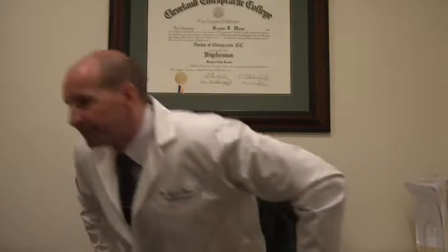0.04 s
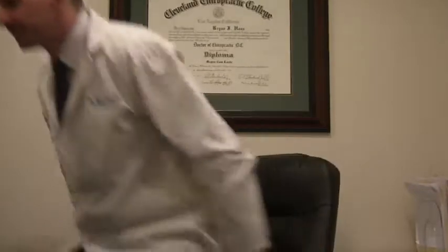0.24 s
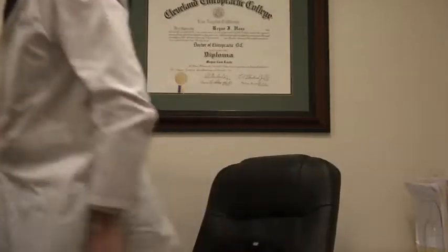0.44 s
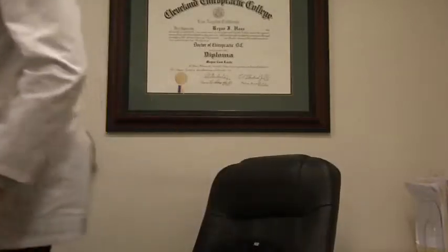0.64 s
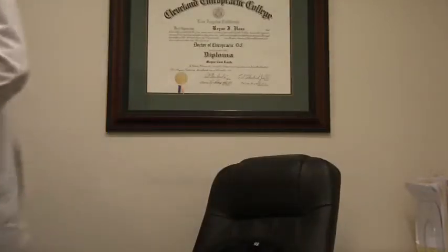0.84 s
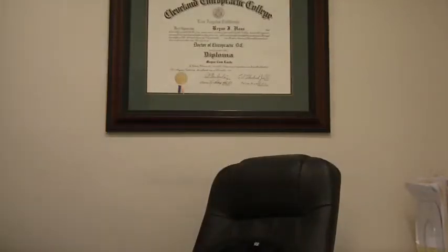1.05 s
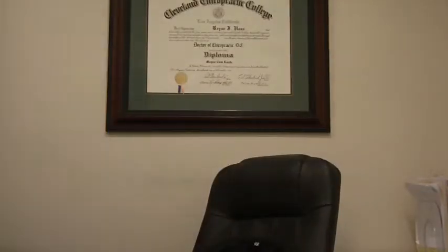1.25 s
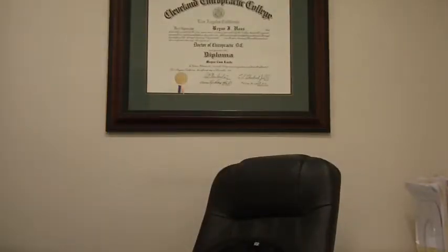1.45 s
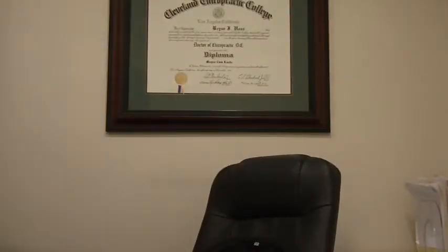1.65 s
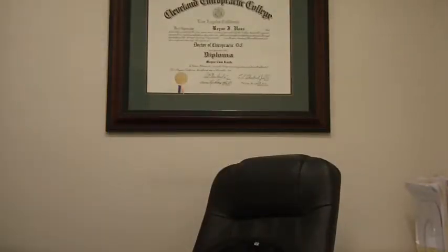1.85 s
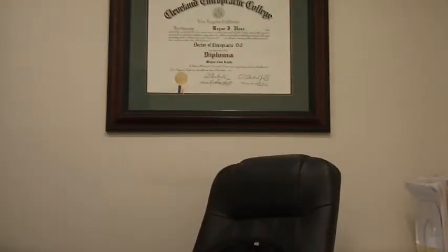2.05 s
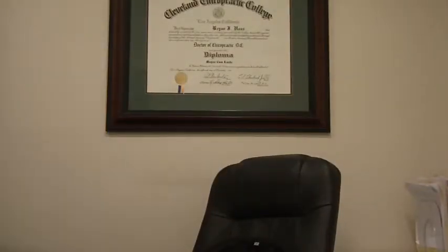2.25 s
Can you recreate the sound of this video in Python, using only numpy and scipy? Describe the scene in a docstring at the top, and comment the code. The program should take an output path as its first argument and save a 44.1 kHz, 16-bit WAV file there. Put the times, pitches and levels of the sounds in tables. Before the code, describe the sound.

Someone rises from an office chair with a thump and rustle, then steps softly away.

```python
"""Ventilation hum and a faint electrical whine fill a small room. Someone rises from a padded
office chair: upholstery rubs, a coat swishes and the chair gives a hollow knock.
Unloaded, it strikes its stop, which rings its modes and rattles its fittings.
Then soft steps cross the carpet; the floor knocks and rings underfoot while the clothes
rustle and the shoes squeak."""
import sys
import numpy as np
from scipy import signal
from scipy.fft import rfft, irfft
from scipy.io import wavfile

SR = 44100
rng = np.random.default_rng(int(sys.argv[2]) if len(sys.argv) > 2 else 0)


def log_audio(samples):
    """Write samples as a 16-bit WAV file to the path given in sys.argv[1]."""
    # one column per channel
    frames = np.atleast_2d(samples).T
    # limit to full scale, then quantise
    limited = np.clip(frames, -1, 1)
    pcm = np.round(limited * 32767).astype(np.int16)
    wavfile.write(sys.argv[1], SR, pcm)


N = 101429
TIME = np.arange(N) / SR


def amp(db):
    """Amplitude ratio of a level in decibels."""
    return 10 ** (np.asarray(db) / 20)


def unit(x):
    """Normalisation to rms 1."""
    return x / np.sqrt(np.mean(x ** 2) + 1e-20)


def read(points, hz):
    """Interpolation on a log-frequency axis."""
    f, value = np.transpose(points)
    return np.interp(np.log(hz + 1), np.log(f + 1), value)


def colour(x, spectrum):
    """Zero-phase filtering by a table of (frequency [Hz], gain [dB])."""
    return irfft(rfft(x) * amp(read(spectrum, np.fft.rfftfreq(N, 1 / SR))), N)


def spread(mid, side):
    """Spatial coherence: two close microphones are alike in the bass, apart in the treble."""
    # side against mid (frequency [Hz], gain [dB])
    width = [(50, -27), (300, -32), (650, -20.5), (1300, -18), (2600, -16), (5000, -6), (9000, -1.5),
             (15000, 0.5)]
    side = colour(side, width)
    return np.array([mid + side, mid - side])


def noise(spectrum):
    """Filtered Gaussian noise in stereo, of rms 1."""
    return unit(spread(*colour(rng.standard_normal((2, N)), spectrum)))


def drift(hz):
    """Low-pass noise: a random wander of rms 1."""
    low_pass = np.exp(-(np.fft.rfftfreq(N, 1 / SR) / hz) ** 2)
    return unit(irfft(rfft(rng.standard_normal(N)) * low_pass, N))


def friction(spectrum):
    """Friction noise: fibres make dense tiny slips of uneven size that come in clumps."""
    slips_per_s, spread_db, flutter_db = 14000, 2.5, 0.54
    size = amp(spread_db * np.minimum(rng.exponential(1, N), 3))
    slips = rng.standard_normal((2, N)) * size * (rng.random(N) < slips_per_s / SR)
    flutter = amp(flutter_db * drift(hz=71.6))
    return unit(spread(*colour(slips * flutter, spectrum)))


def strokes(rows):
    """Envelope in which Gaussian swells with exponential decays add in power."""
    power = 0
    for peak, db, rise, fall in rows:
        exponent = np.where(TIME < peak, ((TIME - peak) / rise) ** 2, (TIME - peak) / fall)
        power += (amp(db) * np.exp(-exponent)) ** 2
    return np.sqrt(power)


def blow(start, rise_s, t60_s):
    """Envelope of a cushioned impact: soft rise, then exponential decay."""
    t = np.maximum(TIME - start, 0)
    attack = np.sin(np.pi / 2 * np.minimum(t / rise_s, 1))
    return attack * amp(-60 * np.maximum(t - rise_s, 0) / t60_s)


def ring(modes, start, rise_s):
    """Modal superposition: damped sinusoids pushed into motion at one moment."""
    return -sum(amp(db) * blow(start, rise_s, t60) * np.sin(2 * np.pi * hz * (TIME - start))
                for hz, db, t60 in modes)


def room_tone():
    """Broadband ventilation noise, with hum and whine under random narrowband modulation."""
    # ventilation spectrum (frequency [Hz], level [dB])
    air = [(20, 1.5), (40, -8), (62, -18), (100, -7), (135, -11), (220, -14), (330, -32), (620, -37),
           (1200, -28.5), (3600, -36.5), (8800, -59), (15000, -54)]
    # hum and electrical whine (frequency [Hz], rms level [dB], waver depth [ratio])
    tones = [(59.2, -42.5, .45), (10191, -70, .3), (10250, -66, .15), (12209, -72, .5)]
    out = amp(-47.5) * noise(air)
    for hz, db, depth in tones:
        waver = 1 + depth * (drift(hz=10) + 1j * drift(hz=10))
        out += amp(db) * unit((waver * np.exp(2j * np.pi * hz * TIME)).real)
    return out


def cloth():
    """Sliding friction gives dull rubbing, bright coat swishes and the rustle of walking."""
    # upholstery and shoes rubbing under load (peak time [s], level [dB], rise [s], fall [s])
    rubs = [(.008, -28.5, 0.023, 0.056), (.21, -42.5, 0.15, 0.15), (.41, -38, 0.077, 0.051),
            (.5, -39, 0.026, 0.046), (1.075, -37, 0.014, 0.019), (1.455, -42, 0.0056, 0.04),
            (1.497, -36, 0.014, 0.076)]
    # coat swishes close by (peak time [s], level [dB], rise [s], fall [s])
    swishes = [(.012, -39, 0.02, 0.048), (.19, -32, 0.056, 0.043), (.238, -28.5, 0.042, 0.018),
               (.329, -27.5, 0.0056, 0.01), (.42, -37, 0.02, .03), (.63, -48.5, 0.014, .02),
               (1.075, -45, 0.029, 0.012)]
    # envelope of the clothes' rustle (time [s], level [dB])
    walk = [(0, -52), (.35, -36), (.5, -40.5), (.73, -46.5), (.9, -44.5), (1.17, -44.5), (1.32, -49),
            (1.45, -41), (1.56, -47), (1.62, -44), (1.8, -44.5), (1.98, -50), (2.15, -49.5), (2.3, -42.5)]
    # spectra of the three kinds of friction (frequency [Hz], level [dB])
    rub_spectrum = [(50, -8), (130, -9.5), (230, 3.5), (420, 0.5), (600, -11.5), (850, -9), (1500, -18.5),
                    (4000, -22), (15000, -51)]
    swish_spectrum = [(150, -26), (500, -0.5), (1700, -3), (2600, -2), (4900, 0), (7500, -3.5), (10500, -8),
                      (15000, -18)]
    rustle_spectrum = [(60, -15), (140, 15), (230, 11), (400, 6), (800, 3.5), (2000, 0), (5000, -3.5),
                       (8000, -12), (15000, -21.5)]
    rubbing = strokes(rubs) * friction(rub_spectrum)
    swishing = strokes(swishes) * friction(swish_spectrum)
    rustling = amp(np.interp(TIME, *np.transpose(walk))) * friction(rustle_spectrum)
    return rubbing + swishing + rustling


def chair():
    """Impacts excite the modes of frame and fittings; the floor rumbles as the weight shifts."""
    # knocks (time [s], level [dB], deep ring gain [dB], fittings gain [dB])
    knocks = [(.016, -31.5, -2, 11.5), (.229, -16.5, -11.5, 7), (.238, -10, -14, -7), (0.2795, -2, 1, 3),
              (0.324, -18, 0, 6)]
    # chair modes (frequency [Hz], level [dB], T60 [s])
    modes = [(162.7, -0.5, 0.049), (136, -26, 0.21), (226.3, -14.5, 0.28), (287.8, -13, 0.12),
             (318.6, -11, 0.14), (422.7, -10, 0.1), (509, -25, 0.31), (584, -24, 0.059), (645, -27, 0.2),
             (827, -32, 0.17), (1054, -39, 0.18), (1258, -30, 0.18), (2560, -40, 0.085), (5300, -49, 0.11)]
    # shifts of weight (peak time [s], level [dB], rise [s], fall [s])
    shifts = [(.295, -22, 0.043, 0.041), (.57, -40, 0.081, 0.045)]
    # spectra of the fittings' rattle and the floor's rumble (frequency [Hz], level [dB])
    rattle_spectrum = [(100, -16), (300, 8.5), (750, 1), (1250, -3), (1700, -11.5), (2300, -6),
                       (3200, -19.5), (5100, -13), (7500, -30), (15000, -53)]
    rumble_spectrum = [(18, -9), (35, -12), (53, 3), (70, -13), (100, -28), (400, -53), (15000, -90)]
    deep_modes, frame_modes, fitting_modes = modes[:3], modes[3:7], modes[7:]
    swell_s, rattle_rise_s = 0.014, 0.0067
    rattle = amp(-19) * noise(rattle_spectrum)
    out = strokes(shifts) * noise(rumble_spectrum)
    for start, db, deep_db, fittings_db in knocks:
        body = amp(deep_db) * ring(deep_modes, start, swell_s) + ring(frame_modes, start, swell_s)
        fittings = ring(fitting_modes, start, rattle_rise_s)
        rattling = blow(start, rattle_rise_s, t60_s=0.19) * rattle
        out += amp(db) * (body + amp(fittings_db) * (fittings + rattling))
    return out


def rough_tones():
    """Narrowband noise bursts: hollow knocks, floor boom and ring, a faint hum, high shoe squeaks."""
    # short tones (peak time [s], pitch [Hz], bandwidth [Hz], level [dB], rise [s], fall [s])
    bursts = [(0.035, 243.4, 32.41, -31, .007, 0.015), (0.236, 740, 129, -27, 0.0071, 0.02),
              (.83, 207.2, 28, -49, 0.12, 0.11), (1.085, 140.6, 25, -39, 0.013, 0.017),
              (1.653, 4750, 120, -51, .008, 0.023), (2.208, 293.7, 24.84, -32, 0.0073, 0.015),
              (2.206, 5520, 118.8, -48, 0.0037, 0.026), (2.217, 493, 23.76, -30.5, 0.0083, 0.0066),
              (2.224, 713, 23.15, -43.5, 0.012, 0.011), (2.278, 1030, 200, -39.5, .003, 0.0041)]
    out = np.zeros(N)
    for peak, hz, bandwidth, db, rise, fall in bursts:
        tone = (drift(bandwidth) + 1j * drift(bandwidth)) * np.exp(2j * np.pi * hz * TIME)
        compressed = tone / (abs(tone) + 1)
        out += strokes([(peak, db, rise, fall)]) * unit(compressed.real)
    return out


def footsteps():
    """Cushioned impacts: each footfall drives the floor's modes, thuds and scuffs the carpet pile."""
    # footfalls, heel then sole (time [s], boom [dB], thud [dB], scuff [dB], board pitch [Hz])
    steps = [(0.906, -33.5, -34, -65, 130.6), (0.939, -58, -41.5, -73, 131), (1.067, -62, -36, -53, 140),
             (1.444, -51, -41, -40.5, 140), (1.513, -25.5, -27, -43, 138.7), (1.54, -36, -34, -42, 139),
             (1.644, -43.5, -40.5, -44.5, 140), (2.191, -29, -26, -42.5, 94),
             (2.2051, -27.5, -42, -52, 90.5), (2.27, -34, -47, -47, 94)]
    # modes of the whole floor (frequency [Hz], level [dB], T60 [s])
    floor_modes = [(27.2, -2.5, 0.4), (59.8, 1, 0.15)]
    # spectra of the carpet's thud and scuff (frequency [Hz], level [dB])
    thud_spectrum = [(60, 3.5), (135, -1.5), (220, 1), (330, -2.5), (500, -1.5), (640, -11), (850, -12.5),
                     (1500, -22), (4000, -39), (15000, -69)]
    scuff_spectrum = [(200, -27), (900, 4.5), (2800, 1.5), (5300, -3), (8000, -10.5), (15000, -24)]
    board_db, board_t60_s = -3, 0.17
    thud, scuff = noise(thud_spectrum), friction(scuff_spectrum)
    out = np.zeros((2, N))
    for start, boom_db, thud_db, scuff_db, board_hz in steps:
        modes = [*floor_modes, (board_hz, board_db, board_t60_s)]
        out += amp(boom_db) * ring(modes, start, rise_s=0.02)
        out += amp(thud_db) * blow(start, rise_s=0.005, t60_s=0.21) * thud
        out += amp(scuff_db) * blow(start, rise_s=0.012, t60_s=0.22) * scuff
    return out


def office(x):
    """Diffuse reverberation: convolution with noise whose bands each decay at their own rate."""
    # reverberation time (frequency [Hz], T60 [s])
    decay = [(60, 0.67), (200, 0.24), (1000, 0.17), (5000, 0.087), (15000, 0.2)]
    # colour of the reflections, weak in the bass (frequency [Hz], gain [dB])
    reflections = [(40, -3), (150, 2.5), (300, -3), (15000, 6.5)]
    build_up_s, wet_db = 0.011, -11.5
    hz, t, bands = signal.stft(rng.standard_normal((2, SR // 2)), SR, nperseg=256)
    tail = signal.istft(bands * amp(-60 * t / read(decay, hz)[:, None]), SR)[1]
    tail *= np.minimum(TIME[:tail.shape[1]] / build_up_s, 1) ** 2
    sent = colour(x.mean(0), reflections)
    wet = signal.fftconvolve(sent[None], tail / np.linalg.norm(tail[0]), axes=1)[:, :N]
    return amp(wet_db) * spread(*wet)


def scene():
    """Superposition of direct sound, reverberation and the room's steady tone."""
    knocks = chair()
    walker = footsteps() + cloth() + rough_tones()
    # the chair is close: less of it arrives by way of the walls
    reverberation = office(amp(-3.5) * knocks + walker)
    return knocks + walker + reverberation + room_tone()


def record(dry):
    """Microphone self-noise, soft saturation of the highest peaks and a low-pass band limit."""
    # hiss, independent in each channel (frequency [Hz], level [dB])
    hiss = [(20, 7), (150, 6), (350, -0.5), (700, 2), (1500, 0.5), (3000, -1.5), (6000, -0.5),
            (10000, -3.5), (15000, -6.5)]
    hiss_db, ceiling, edge_hz = -50, 0.97, 15200
    x = dry + amp(hiss_db) * unit(colour(rng.standard_normal((2, N)), hiss))
    rounded = x / (1 + (x / ceiling) ** 8) ** (1 / 8)
    low_pass = signal.firwin(511, edge_hz, window=("kaiser", 9), fs=SR)
    return signal.oaconvolve(rounded, low_pass[None], "same")


dry = scene()
out = record(dry)
log_audio(out)
```